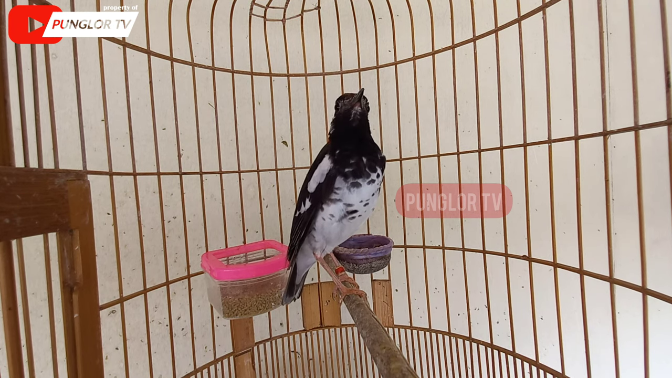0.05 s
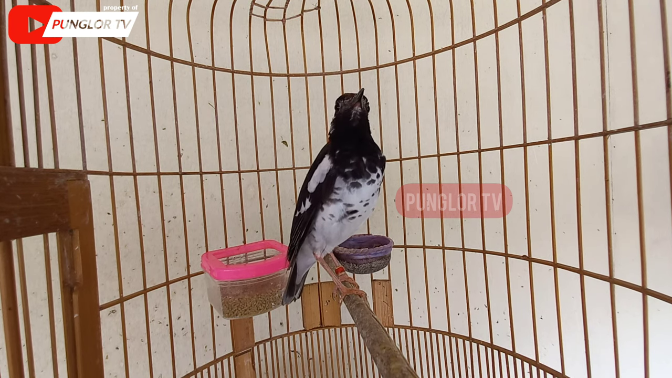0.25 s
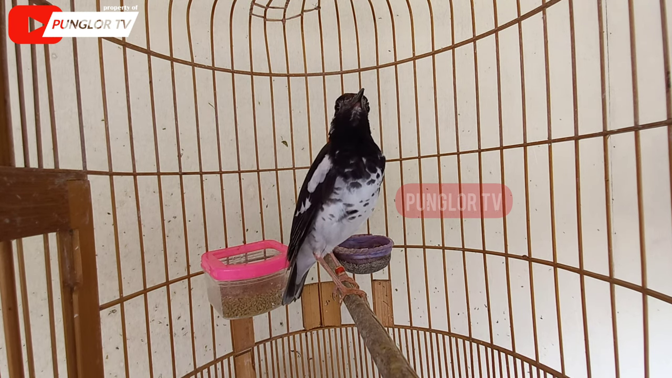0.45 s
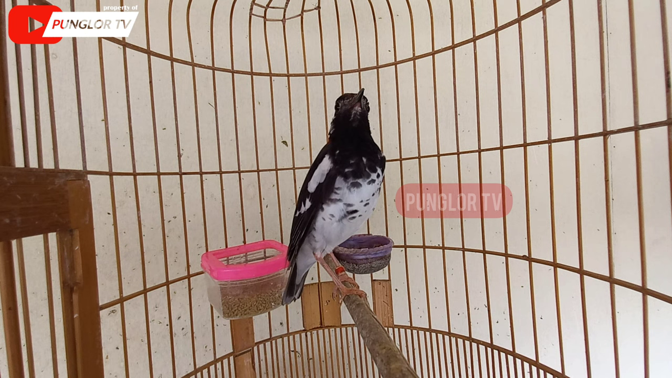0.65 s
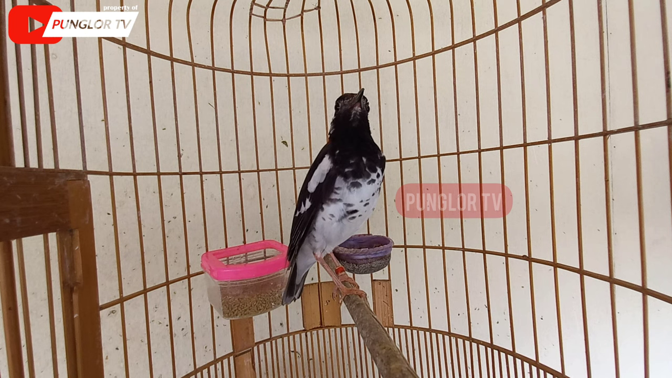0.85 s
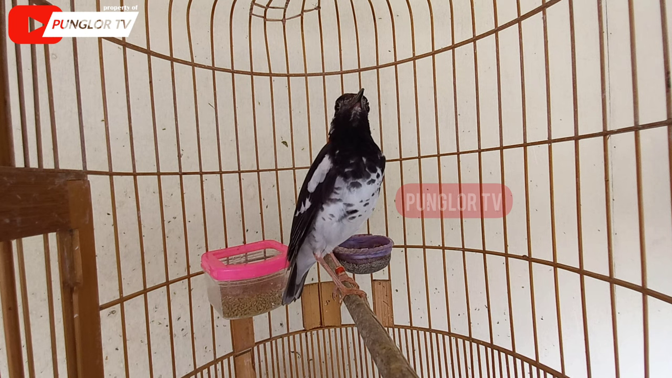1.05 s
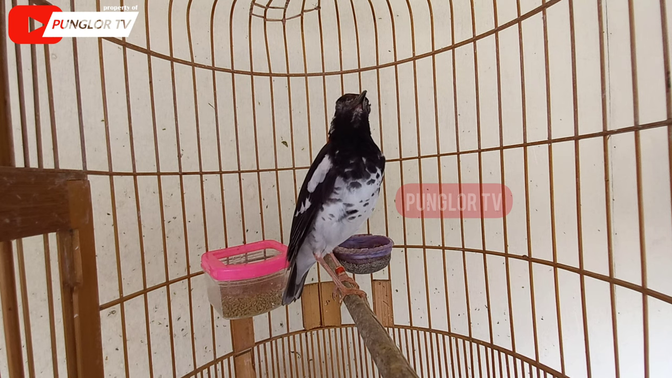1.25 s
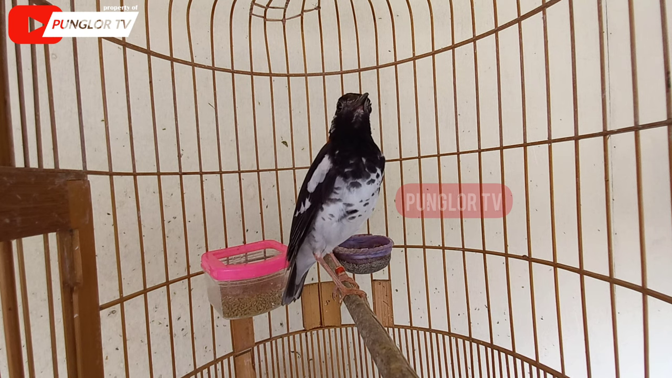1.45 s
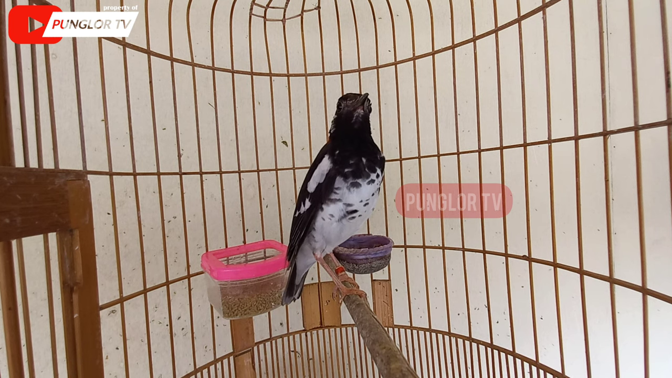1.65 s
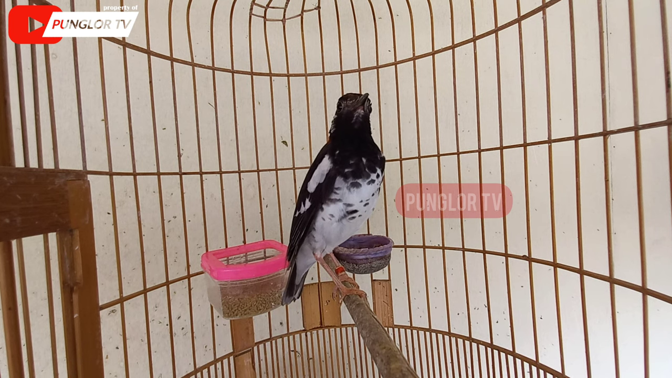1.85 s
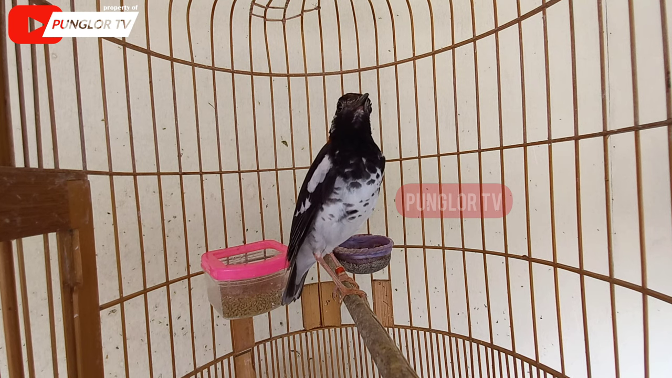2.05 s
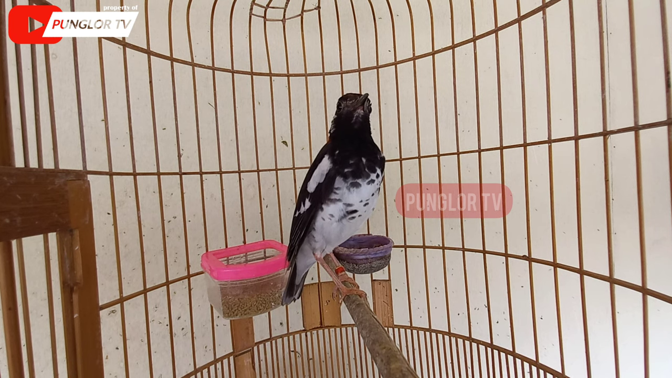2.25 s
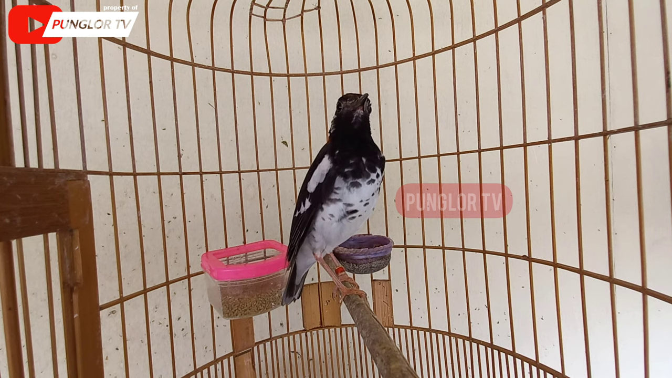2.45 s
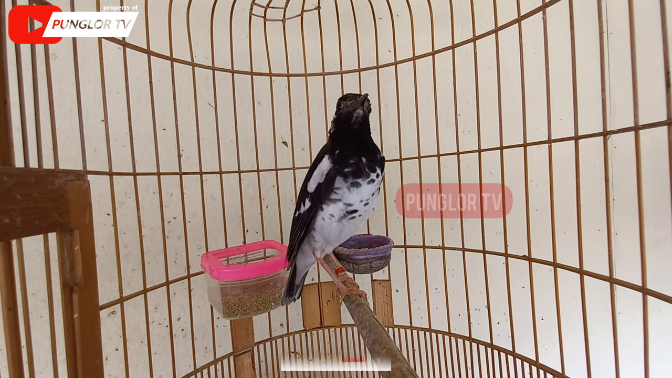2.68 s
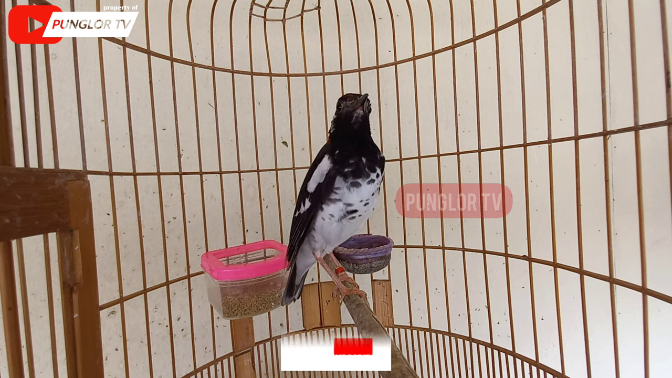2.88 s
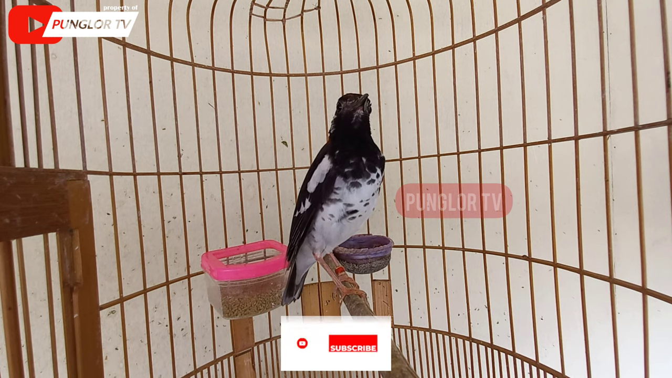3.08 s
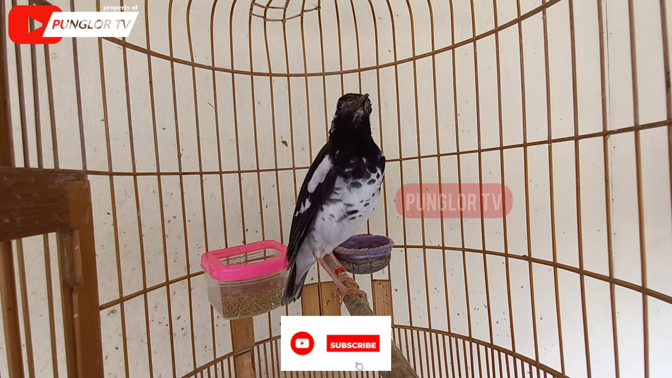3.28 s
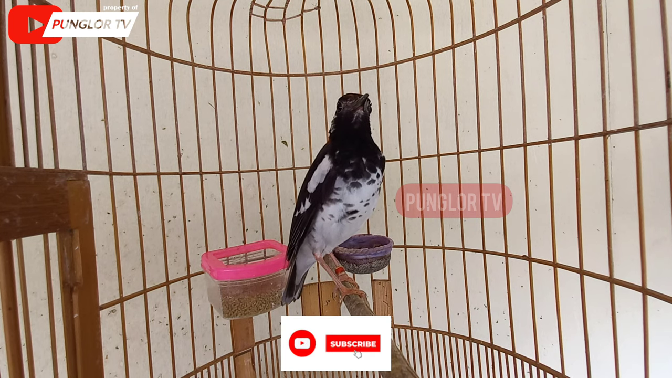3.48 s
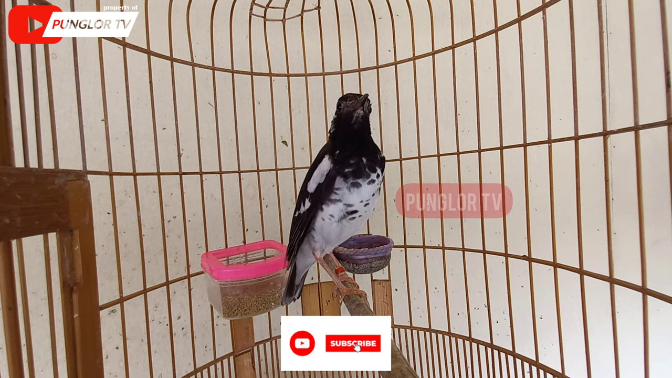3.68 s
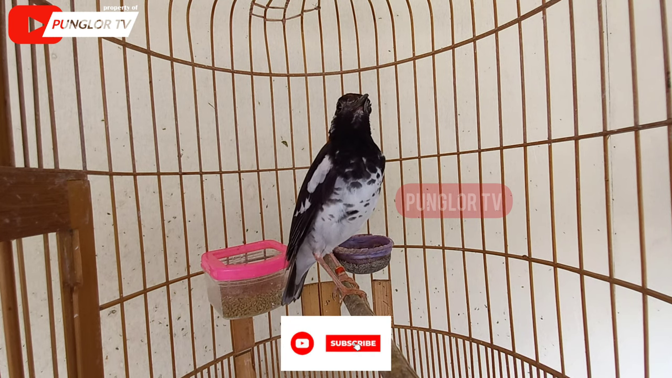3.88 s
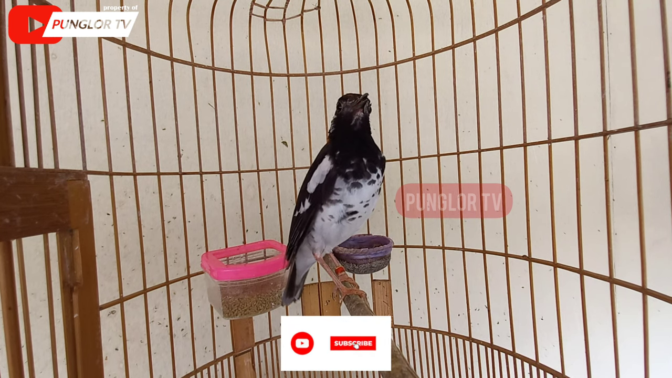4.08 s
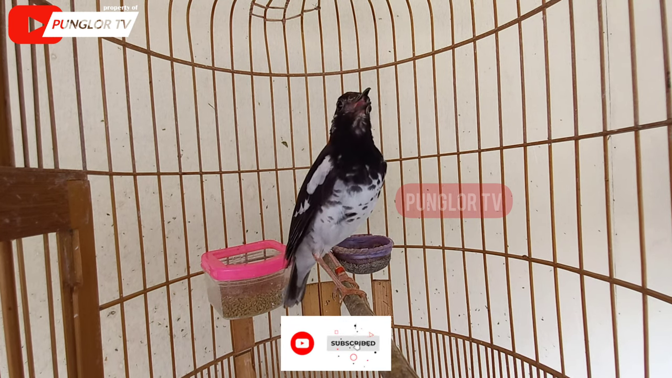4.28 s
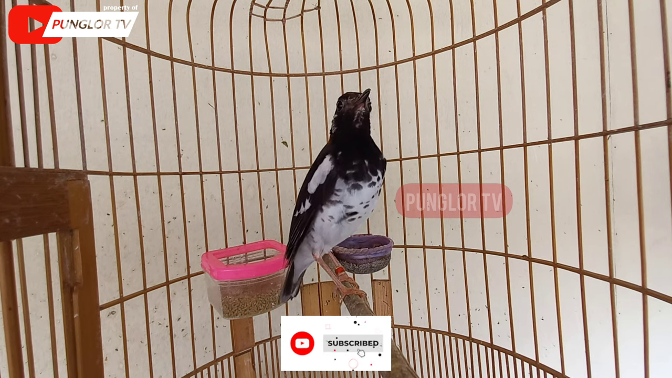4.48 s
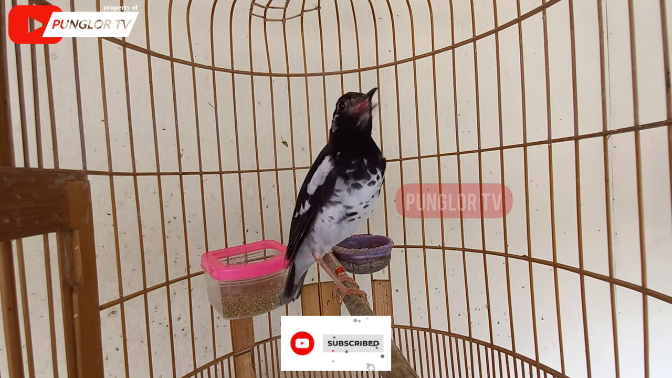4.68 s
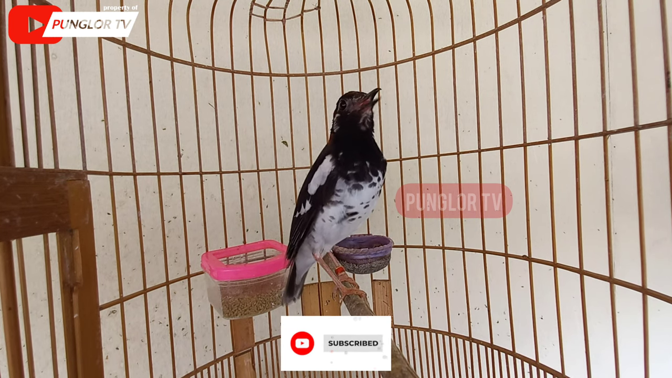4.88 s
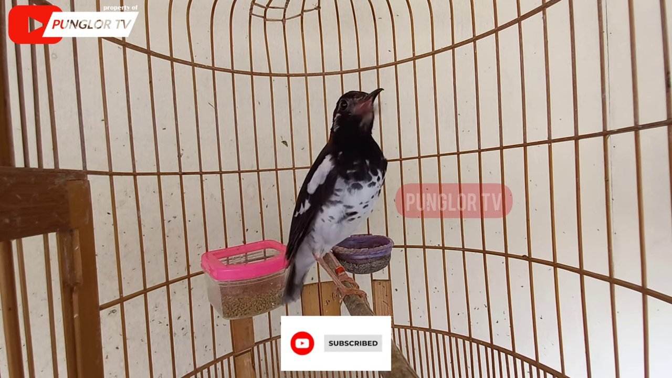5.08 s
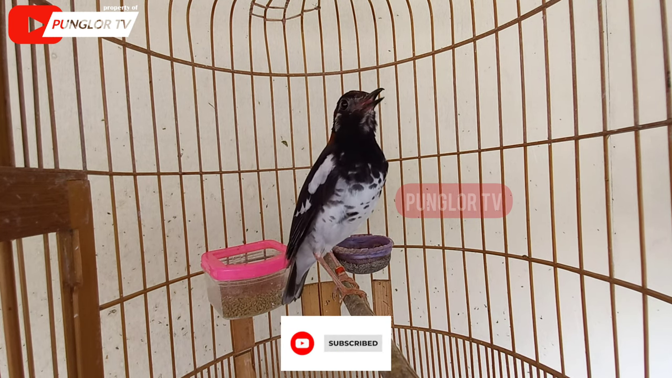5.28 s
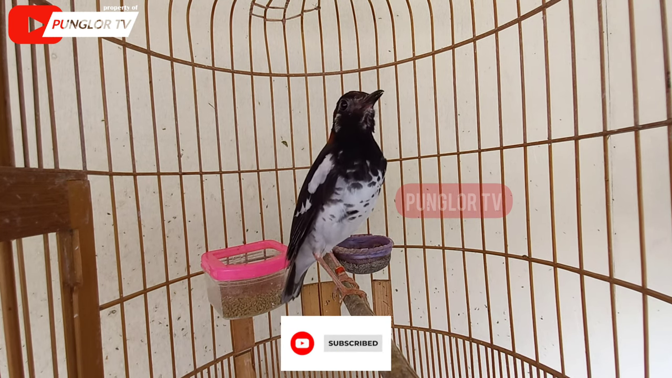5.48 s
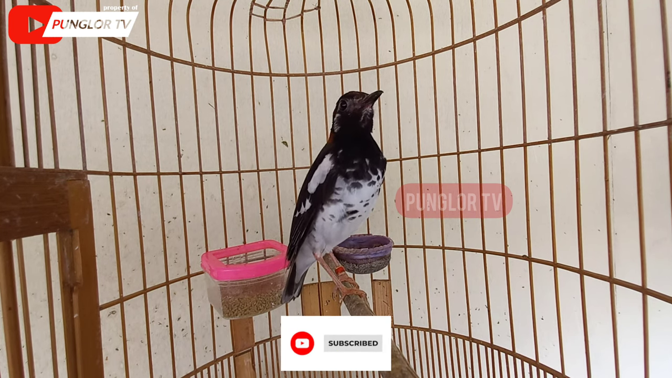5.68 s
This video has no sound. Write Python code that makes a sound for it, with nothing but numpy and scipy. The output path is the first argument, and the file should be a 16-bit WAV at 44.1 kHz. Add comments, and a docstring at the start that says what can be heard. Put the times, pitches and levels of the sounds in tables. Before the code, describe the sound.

Indoors, a low hum and soft rumble with a faint hissy rustle. Far away a small bird twitters the same quick phrase over and over, blurred by reverberation. Then a nearby songbird breaks in, bright and much louder, with clear whistles, one very high thin note, rasping low notes and rapid chirps separated by short gaps. The close microphone strains on the peaks, and the room rings briefly after each note.

```python
"""From the start a far bird gives lone notes and a repeated warbled phrase, gliding tones heard only as room echo.
From 4.1 s a caged thrush sings close by: whistles, sweeps and buzzy trills, near sines with weak overtones
and breath hiss, followed by reflections and the tail of a hard room. Throughout lie a mains hum and a low
rumble of shaped noise, and a faint treble rustle that comes and goes.
The recorder overloads on loud peaks and turns its gain down."""
import sys
import numpy as np
from scipy import signal
from scipy.fft import rfft, irfft, next_fast_len
from scipy.io import wavfile
from scipy.ndimage import uniform_filter1d, map_coordinates

SR = 44100
rng = np.random.default_rng(int(sys.argv[2]) if len(sys.argv) > 2 else 0)


def gain_from_db(level_db):
    """Convert decibel levels to linear amplitude factors (20 dB per decade)."""
    decades = np.asarray(level_db, float) / 20
    return 10 ** decades


def master(y):
    """Save y as 16-bit WAV."""
    cut = np.clip(np.atleast_2d(y).T, -1, 1)
    pcm = np.round(cut * 32767)  # scale
    wavfile.write(sys.argv[1], SR, pcm.astype(np.int16))


N = 253032


def thrush():
    """Source and image paths: the voice reaches the left sooner and louder, then come reflections and a tail."""
    # notes of the song; the last sounds with the fifth, from the other side of the syrinx:
    # (octave level/dB, overtones level/dB, breath level/dB), then rows (t/s, f/Hz, level/dB)
    song = [ ((-27, -22.5, -30.5), [(4.143, 1658, -50.5), (4.148, 1957, -15), (4.158, 2450, -1),
            (4.170, 2881, 0.5), (4.182, 3198, 1), (4.194, 3214, -18), (4.203, 3010, -32)]),
            ((-30, -28, -57), [(4.203, 2600, -21.5), (4.212, 2426, -9), (4.240, 2412, -3), (4.264, 2368, 0),
            (4.274, 2316, -2.5), (4.279, 2351, -8), (4.297, 2376, -19), (4.322, 2300, -37)]),
            ((5.4, -14, -11.5), [(4.328, 1785, -28.5), (4.331, 1842, -18.5), (4.343, 1982, -20.5),
            (4.360, 1948, -15), (4.368, 1750, -21), (4.376, 1470, -19.5), (4.381, 1386, -39)]),
            ((-11, -44.5, -60.5), [(4.604, 2574, -23.5), (4.609, 4880, -25), (4.615, 6520, -27),
            (4.622, 7017, -12), (4.650, 6980, -14), (4.685, 6860, -0.5), (4.710, 6770, -17.5),
            (4.729, 6936, -6.5), (4.745, 6950, -45.5)]), ((-23.5, -15, -42.5), [(4.795, 1974, -32.5),
            (4.803, 2167, -12.5), (4.820, 2274, -9), (4.850, 2310, -10), (4.878, 2338, -9.5),
            (4.892, 2260, -10), (4.903, 1940, -17.5), (4.910, 1710, -30)]), ((-75.5, -48, -29),
            [(5.003, 3117, -18), (5.007, 3172, -5.5), (5.012, 3126, -17), (5.017, 3150, 5.5),
            (5.022, 2720, -3), (5.027, 2277, 2.5), (5.033, 2215, -4.5), (5.038, 2180, -46.5)]),
            ((-32, -33.5, -26.5), [(5.050, 1970, -33), (5.054, 2273, -2.5), (5.060, 2930, 3.5),
            (5.065, 3455, 6.5), (5.071, 3700, 0), (5.076, 3150, -12.5), (5.081, 2624, 3.5),
            (5.085, 2250, -44.5)]), ((-22, -34, -29), [(5.146, 4030, -29), (5.149, 4325, -3),
            (5.155, 4693, -12), (5.160, 3906, -1), (5.166, 3400, -2.5), (5.170, 3610, -52.5)]),
            ((-39, -26.5, -30.5), [(5.158, 3385, -30), (5.168, 3417, 5), (5.178, 3292, 4.5),
            (5.212, 3153, 4.5), (5.217, 3150, -26.5), (5.226, 3155, -22), (5.229, 3102, 7),
            (5.244, 3065, 3.5), (5.275, 3050, -39)]), ((9.7, -14, -12), [(5.325, 1450, -50),
            (5.329, 1730, -28.5), (5.336, 1917, -31), (5.348, 1708, -23.5), (5.357, 1580, -31),
            (5.362, 1540, -28)]), ((-28, -32.5, -19.5), [(5.362, 2074, -30), (5.366, 1955, -8),
            (5.385, 1969, -11.5), (5.410, 2003, -7), (5.440, 1861, -5.5), (5.455, 1712, -17),
            (5.463, 1550, -28)]), ((-24.5, -31, -29.5), [(4.782, 2403, -15), (4.787, 2750, -12),
            (4.795, 3682, -1), (4.803, 4156, -4), (4.850, 4430, -2.5), (4.880, 4304, -8.5),
            (4.897, 4070, -5.5), (4.908, 3220, -1), (4.917, 3000, -39.5)]), ]
    # faint half-pitch tone under the high whistle: (t/s, f/Hz, level/dB)
    undertone = [(4.668, 3450, -70), (4.685, 3445, -46), (4.715, 3424, -40), (4.74, 3440, -66)]
    # notes that trill, by place in the song: (swing rate/Hz, pitch swing/share, roughness/share)
    trills = {2: (290, .018, .2), 4: (127, .04, .12), 9: (200, .05, .4), 10: (64, .085, .12),
              11: (127, .055, .33)}
    # first reflections: (left delay/ms, right delay/ms, level/dB)
    reflections = [(2.3, 3.5, -9), (5.7, 12, -14), (9.4, 19, -17), (14.5, 9, -19)]
    clear = 0, 0, .012                      # no trill, hardly any roughness
    room_db, room_t60_s, room_onset_s = -13, .43, .0034
    right_lag_ms, left_over_right_db = .113, 1.9

    voice = np.zeros(N)
    air = turbulence(9600, 14600)
    for place, (colour, rows) in enumerate(song):
        syrinx_note(voice, rows, trills.get(place, clear), colour, air)
    syrinx_note(voice, undertone, clear, (-60, 17, -70), air)

    room = gain_from_db(room_db) * room_tail(room_t60_s, room_onset_s)
    heard = signal.fftconvolve(voice[None], room, axes=1)[:, :N]
    sample = np.arange(N)
    paths = [(0, right_lag_ms, 0)] + list(reflections)    # direct sound first
    for k, (left_ms, right_ms, level_db) in enumerate(paths):
        sign = (-1) ** k                    # successive paths alternate in polarity
        for side, lag_ms in enumerate((left_ms, right_ms)):
            late = map_coordinates(voice, [sample - lag_ms * SR / 1000], order=3, mode="nearest")
            heard[side] += sign * gain_from_db(level_db) * late
    return heard * gain_from_db([[left_over_right_db / 2], [-left_over_right_db / 2]])


def syrinx_note(voice, rows, trill, colour, air):
    """Harmonic series with frequency modulation: a membrane shaken by turbulence, with air hissing past."""
    # multiples 3 to 7 of the pitch, relative to the note's overtone level: (level/dB)
    overtone_levels = [-3.5, -10, -4, 0.5, -31]
    edge_s = .002
    rate, depth, rough = trill
    octave_db, overtones_db, breath_db = colour
    breath, (phase_shake, strength_shake) = air
    s, hz, level_db = np.transpose(rows)
    span = np.arange(int(s[0] * SR), min(int(s[-1] * SR), N))
    t = span / SR

    swing = np.sin(2 * np.pi * rate * (t - s[0]))
    pitch = np.interp(t, s, hz) * (1 + depth * swing)
    phase = 2 * np.pi * np.cumsum(pitch) / SR + rough * phase_shake[span]
    tone = np.sin(phase) + gain_from_db(octave_db) * np.sin(2 * phase)
    for multiple, step_db in enumerate(overtone_levels, start=3):
        if multiple * max(hz) < SR / 2:
            tone += gain_from_db(overtones_db + step_db) * np.sin(multiple * phase)
    tone = tone * (1 + rough * strength_shake[span]) + gain_from_db(breath_db) * breath[span]

    louder_when_high = 1 + 4.9 * depth * swing
    edges = np.clip(np.minimum(t - s[0], s[-1] - t) / edge_s, 0, 1)
    strength = uniform_filter1d(gain_from_db(np.interp(t, s, level_db)), size=64)   # the muscles cannot jump
    voice[span] += strength * edges * louder_when_high * tone


def turbulence(low_hz, high_hz):
    """Turbulent flow as band-limited noise: a steep band of hiss, and a fast flutter for phase and strength."""
    hiss = band(band(rng.standard_normal(N), low_hz, high_hz), low_hz, high_hz)
    flutter = band(rng.standard_normal((2, N)), 48, 250)
    return rms_one(hiss), rms_one(flutter)


def room_tail(t60_s, onset_s):
    """Diffuse reverberation: exponentially decaying noise, unrelated left and right, the treble dying sooner."""
    t = np.arange(int(.9 * SR)) / SR
    noise = rng.standard_normal((2, len(t)))
    low = band(noise, 200, 6700) * gain_from_db(-60 * t / t60_s)
    high = band(noise, 5000, 17000) * gain_from_db(-60 * t / (.8 * t60_s))
    build_up = 1 - np.exp(-t / onset_s)
    # scale by the energy of the lower band, for near unit gain inside it
    energy = np.sum(low ** 2, axis=1, keepdims=True)
    return (low + high) * build_up / np.sqrt(energy / 10000 * SR / 2)


def far_bird():
    """Reverberant field alone: short gliding warbles with no direct path to the microphones."""
    # five notes of the phrase, before each repeat's stretch and shares:
    # (t/s from its start, length/s, start f/Hz, end f/Hz, level/dB re repeat, warble depth/share)
    phrase = [(0.0, 0.074, 4467, 4645, 0, 0.03), (.044, 0.049, 3243, 2577, -7.5, 0.089),
              (.148, 0.0503, 3705, 3570, -3.5, 0.034), (.188, .028, 2700, 2460, -11.5, .03),
              (.232, .07, 3465, 3366, 1, 0.02)]
    # each singing: (t/s, time stretch/ratio, level/dB, opening note's f/ratio, its level/dB, other notes' f/ratio)
    repeats = [(1.203, 0.95, -35.5, 1.005, -37.5, 1.01), (1.578, 1.03, -37.5, 1, -40, 0.97),
               (1.943, 1.025, -38, 1.01, -40.5, 0.97), (2.327, 1.03, -40, 1, -41.5, 0.95),
               (2.723, 1.1, -40.5, 1.06, -38.5, .955), (3.144, 0.93, -39.5, 1.003, -40, 0.96)]
    # notes around the phrases: (t/s, length/s, start f/Hz, end f/Hz, mid-note level/dB, warble depth/share)
    lone_notes = [(0.00, 0.039, 3230, 3890, -34.5, 0.14), (0.058, 0.059, 3957, 4010, -33, 0.04),
                  (1.008, 0.048, 3760, 3580, -45.5, 0.024), (1.065, 0.097, 3384, 3820, -39.5, .13),
                  (3.399, 0.042, 4790, 5190, -52.5, 0.045), (3.572, 0.049, 5010, 5420, -50.5, 0.014),
                  (4.023, 0.16, 5070, 5370, -56.5, 0.073)]
    last_repeat_notes = 2                   # the last repeat stops short
    warble_hz, rough = 95, .18
    colour = -30, -33, -19.2                # octave, overtones, breath in dB
    t60_s, onset_s = .5, .02

    notes = list(lone_notes)
    for k, (start, stretch, phrase_db, opening, opening_db, others) in enumerate(repeats):
        sung = phrase if k < len(repeats) - 1 else phrase[:last_repeat_notes]
        for place, (s, length, from_hz, to_hz, relative_db, depth) in enumerate(sung):
            share, base_db = (others, phrase_db) if place else (opening, opening_db)
            notes.append((start + stretch * s, stretch * length,
                          share * from_hz, share * to_hz, base_db + relative_db, depth))

    voice = np.zeros(N)
    air = turbulence(1700, 7470)
    for s, length, from_hz, to_hz, level_db, depth in notes:
        rows = [(s, from_hz, level_db + 15.5),
                (s + length / 2, (from_hz + to_hz) / 2, level_db),
                (s + length, to_hz, level_db + 4.5)]
        syrinx_note(voice, rows, (warble_hz, depth, rough), colour, air)
    return signal.fftconvolve(voice[None], room_tail(t60_s, onset_s), axes=1)[:, :N]


def mains_hum():
    """Harmonics of one wandering fundamental, each multiple wavering in level by itself."""
    # (multiple of the fundamental, level/dB re hum level)
    hum_parts = [(1, -8.5), (2, -18.5), (3, -19.5), (6, -20)]
    hum_hz, wander_hz, hum_db, waver_db = 100, .786, -6, 1.1
    phase = 2 * np.pi * np.cumsum(hum_hz + wander_hz * drift(2.56)) / SR
    hum = np.zeros(N)
    for multiple, level_db in hum_parts:
        hum += gain_from_db(hum_db + level_db + waver_db * drift(5.3)) * np.sin(multiple * phase)
    return hum


def rumble_and_hum():
    """Spectrally shaped noise plus hum, split by a low-pass so that the bass swells apart from the rest."""
    # (f/Hz, spectral level/dB)
    rumble_spectrum = [(12, -84.5), (20, -35), (59, -23), (68, -36.5), (79, -9), (106, 6.5), (135, -4),
                       (181, -14.5), (333, -16), (474, -22), (589, -21.5), (650, -30), (731, -26.5),
                       (1320, -39), (2200, -43.5), (2860, -64), (4840, -120)]
    # gain of the bass: (t/s, level/dB)
    bass_levels = [(0.0, -36.5), (.25, -37), (.5, -46), (1.0, -39), (1.15, -33), (1.85, -40), (2.0, -31),
                   (2.3, -39), (3.4, -36), (3.6, -40), (4.15, -35), (4.4, -42), (5.7, -42)]
    bass_top_hz, upper_db = 170, -38.5
    low = coloured(rumble_spectrum, patchy_db=.97) + mains_hum()
    bass = signal.sosfiltfilt(signal.butter(2, bass_top_hz, fs=SR, output="sos"), low)
    bass_gain = gain_from_db(np.interp(np.arange(N) / SR, *np.transpose(bass_levels)))
    return bass_gain * bass + gain_from_db(upper_db) * murmur(low - bass)


def rustle():
    """Amplitude-modulated treble noise: the powers of separate swells add over a resting level."""
    # (f/Hz, spectral level/dB)
    rustle_spectrum = [(2000, -33.5), (3200, -18), (4300, -18), (5200, -10), (7000, -18), (10500, -17),
                       (13500, -20), (15700, -27)]
    # (peak t/s, rise/s, fall/s, peak level/dB)
    swells = [(.08, .1, 0.12, -53.5), (.66, 0.51, 0.11, -54.5), (.79, 0.037, 0.15, -53.5),
              (1.11, 0.13, 0.28, -54), (1.47, 0.059, 0.21, -49.5), (1.64, 0.29, 0.051, -49.5),
              (2.03, .2, 0.41, -54), (2.48, 0.19, 0.18, -56.5), (2.72, 0.36, 0.2, -58),
              (3.22, 0.028, 0.18, -65), (3.46, 0.17, 0.064, -62.5), (3.65, 0.19, 0.34, -62.5)]
    depth_db, rest_db = 12.5, -70           # depth: change over one rise or fall time
    t = np.arange(N) / SR
    power = gain_from_db(2 * rest_db)
    for peak, rise, fall, level_db in swells:
        away = np.where(t < peak, (peak - t) / rise, (t - peak) / fall)
        power = power + gain_from_db(2 * (level_db - depth_db * away))
    return np.sqrt(power) * coloured(rustle_spectrum, patchy_db=.6)


def coloured(spectrum, patchy_db):
    """Filtered noise of set interchannel correlation, high in the bass, flickering a little; rms 1."""
    # correlation of left and right: (f/Hz, likeness from -1 to 1)
    likeness = [(60, 0.99), (180, 0.97), (550, 0.53), (1650, -0.22), (4970, 0.18), (15000, -0.27)]
    hz = np.maximum(np.arange(N // 2 + 1) * SR / N, 1)
    mid, side = rfft(rng.standard_normal((2, N))) * gain_from_db(at_hz(spectrum, hz))
    alike = np.clip(at_hz(likeness, hz), -1, 1)
    both = irfft(np.sqrt(1 + alike) * mid + np.sqrt(1 - alike) * side * [[1], [-1]], N)
    return rms_one(both * gain_from_db(patchy_db * drift(6)))


def murmur(x):
    """Independent band modulation: thirds of an octave, each wavering in level by itself."""
    waver_db, waver_hz, bands = 3, 4.5, 14
    size = next_fast_len(N)
    spectrum = rfft(x, size)
    hz = np.maximum(np.arange(size // 2 + 1) * SR / size, 1)
    # the end bands take in all that lies beyond them
    third = np.clip(np.round(3 * np.log2(hz / 150)), 0, bands - 1)
    out = np.zeros_like(x)
    for k in range(bands):
        part = irfft(spectrum * (third == k), size)[:, :N]
        out += part * gain_from_db(waver_db * drift(waver_hz))
    return out


def drift(rate_hz):
    """Low-pass random process of spread 1, drawn at every 40th sample and interpolated."""
    r = np.exp(-80 * np.pi * rate_hz / SR)
    slow = signal.lfilter([1], [1, -2 * r, r * r], rng.standard_normal(N // 40 + 2002))
    slow = slow[2000:]                      # skip the filter's start
    return np.interp(np.arange(N) / 40, np.arange(len(slow)), rms_one(slow))


def band(x, low_hz, high_hz):
    """Band limiting by a Butterworth filter, flat within its pass band."""
    return signal.sosfilt(signal.butter(2, [low_hz, high_hz], "band", fs=SR, output="sos"), x)


def at_hz(points, hz):
    """Interpolation along a logarithmic frequency axis."""
    table_hz, values = np.transpose(points)
    return np.interp(np.log(hz), np.log(table_hz), values)


def rms_one(x):
    """Normalisation of the mean power to 1."""
    return x / np.sqrt(np.mean(x ** 2) + 1e-20)


def scene():
    """Superposition of both birds and the background."""
    return thrush() + far_bird() + rumble_and_hum() + rustle()


def top_cut(x):
    """Nothing passes above the cut-off."""
    return signal.sosfilt(signal.butter(12, 15840, fs=SR, output="sos"), x)


def record(dry):
    """Slow gain control, then quadratic distortion adding low thumps, clipping at full scale and band limits."""
    knee_db, cut_per_excess_db, attack_s = -19.5, .5, 1
    excess_fall_db_per_s = .5               # release of the held excess
    uneven_db = -35
    level_db = 10 * np.log10(uniform_filter1d(np.mean(dry ** 2, axis=0), size=1024) + 1e-12)
    excess_db = np.maximum(level_db - knee_db, 0)
    # hold each peak of the excess along a steadily falling line
    fall = excess_fall_db_per_s * np.arange(N) / SR
    held_db = np.maximum.accumulate(excess_db + fall) - fall
    r = np.exp(-1 / (attack_s * SR))
    cut_db = signal.lfilter([1 - r], [1, -r], cut_per_excess_db * held_db)

    x = dry * gain_from_db(-cut_db)
    x = np.clip(x + gain_from_db(uneven_db) * x ** 2, -1, 1)
    x = signal.sosfilt(signal.cheby2(12, 50, 15900, fs=SR, output="sos"), x)
    x = signal.sosfilt(signal.butter(2, 25, "high", fs=SR, output="sos"), x)
    return top_cut(np.clip(x, -1, 1))


dry = scene()
out = record(dry)
master(out)
```